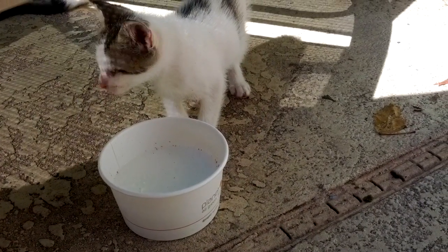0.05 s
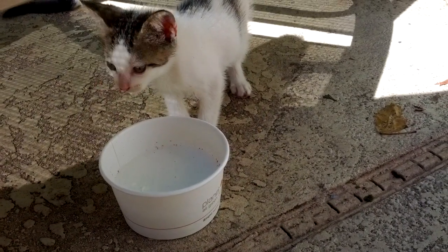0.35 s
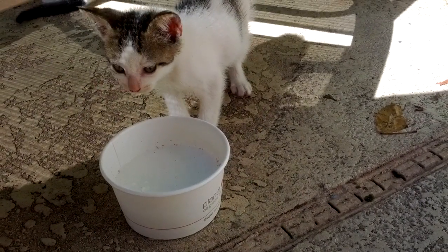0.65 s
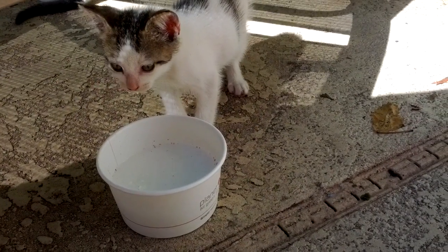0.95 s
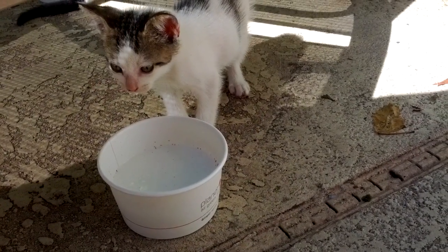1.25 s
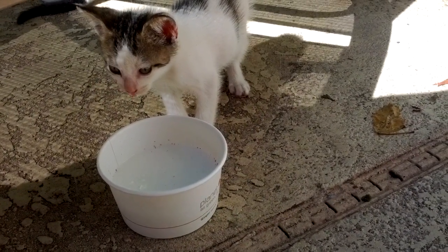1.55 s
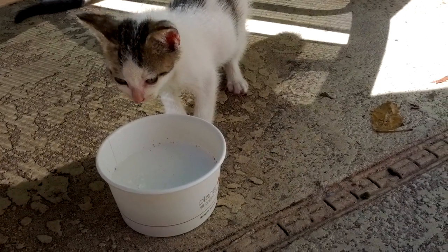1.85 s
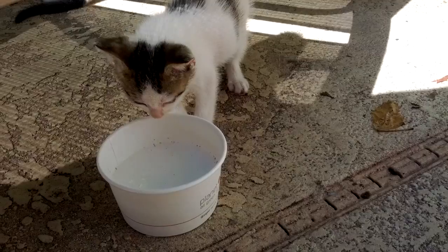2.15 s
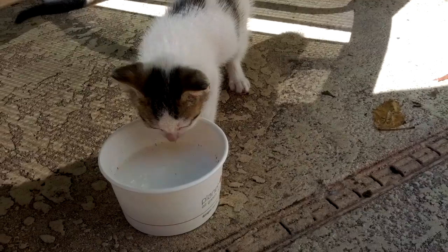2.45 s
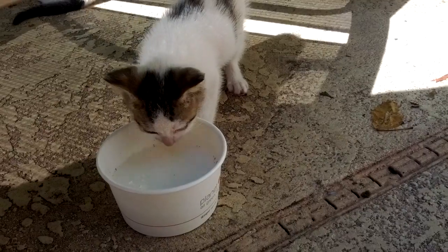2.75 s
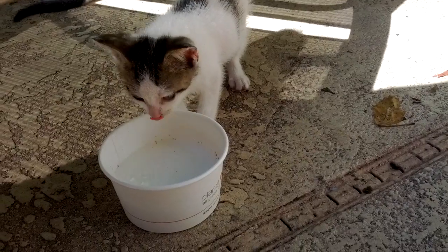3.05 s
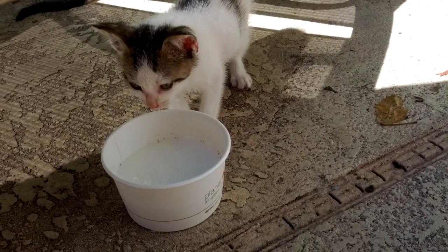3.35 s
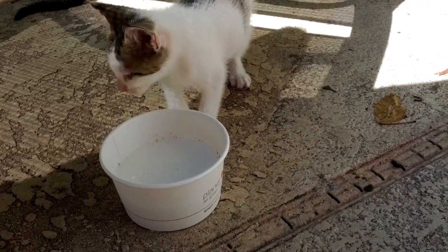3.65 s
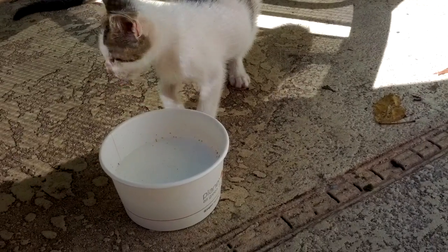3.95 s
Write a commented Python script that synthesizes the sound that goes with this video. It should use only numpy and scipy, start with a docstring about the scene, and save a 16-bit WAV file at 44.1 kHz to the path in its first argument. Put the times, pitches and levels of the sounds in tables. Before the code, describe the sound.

A distant engine hums and slowly rises in pitch, heard from a sheltered yard over a low traffic rumble and faint hiss. At about 0.8 seconds something hard knocks once nearby, sharp and hollow, with a brief echo. The engine booms louder from around 1.5 seconds, peaks in pitch near 3 seconds, then drops with a short exhaust burble and fades. A few tiny ticks sit in the background.

```python
"""A distant engine slowly speeds up, then the throttle closes and the exhaust burbles.
Its firings make a stack of tones, and the one at five times the firing rate booms.
We listen from a sheltered yard, where something hard knocks once nearby and the walls ring briefly.
Behind it all, far traffic rumbles, and tiny ticks and thin whines sit in the hiss."""
import sys
import numpy as np
from scipy import signal
from scipy.io import wavfile

SR = 44100
rng = np.random.default_rng(int(sys.argv[2]) if len(sys.argv) > 2 else 0)


def file_out(sig):
    """Save sig as 16-bit WAV at sys.argv[1]."""
    # one column per channel
    cols = np.atleast_2d(sig).T
    # limit, then scale
    lim = np.clip(cols, -1, 1)
    pcm = np.round(lim * 32767).astype(np.int16)
    wavfile.write(sys.argv[1], SR, pcm)


N = 176400
T = np.arange(N) / SR

# how fast the engine fires: time_s, firing_rate_hz
FIRING_RATE = [(0, 25.5), (0.5, 27.2), (1.0, 30.2), (1.25, 31.5), (1.6, 32.8), (2.05, 34.5), (2.3, 34.9),
               (2.55, 35.55), (2.85, 35.95), (3.07, 35.8), (3.3, 33.8), (3.5, 32.0), (4.0, 29.7)]
# loudness of the low exhaust note: time_s, level_db
NOTE_LEVEL = [(0, -52.5), (0.45, -46.5), (0.75, -43.5), (1.3, -45.5), (1.9, -46), (2.3, -47), (2.7, -46.5),
              (3.05, -54.5), (3.3, -49.5), (3.5, -55), (4.0, -53.5)]
# tones in that note: multiple_of_firing_rate, gain_db
NOTE_TONES = {2: -9, 3: -5.5, 4: 0, 6: 0.36}
# loudness of the higher exhaust drone: time_s, level_db
DRONE_LEVEL = [(0, -50), (0.55, -49), (0.95, -53.5), (1.2, -46.5), (1.75, -44.5), (2.1, -45.5),
               (2.42, -45.5), (2.6, -53.5), (3.3, -54.5), (4.0, -71)]
# tones in that drone: multiple_of_firing_rate, gain_db
DRONE_TONES = {7: -16.5, 8: 0, 9: -4.5, 10: -13}
# loudness of the boom: time_s, level_db
BOOM_LEVEL = [(0, -49), (0.9, -53), (1.15, -50), (1.45, -43), (1.68, -36), (1.9, -36.5), (2.15, -37.5),
              (2.4, -34), (2.9, -35.5), (3.12, -35.5), (3.24, -31.5), (3.33, -31.5), (3.39, -48),
              (3.6, -45), (4.0, -61)]
# loudness of the rough burble, strongest as the throttle closes: time_s, level_db
BURBLE_LEVEL = [(0, -52.5), (3.05, -60), (3.27, -35.5), (3.42, -45.5), (3.68, -42), (3.85, -53.5),
                (4.0, -73)]
# quick contacts that make up the knock: start_s, thud_db, crack_db
CONTACTS = [(0.7594, -18, -28), (0.7647, -41, -24), (0.7662, -34, -28.5), (0.7699, -33, -33.5),
            (0.7885, -49, -38), (0.7945, -29, -29)]
# tones of the struck object (a fade is a drop of 60 dB): pitch_hz, gain_db, fade_s
OBJECT_TONES = [(475, -23, 0.021), (652, 2.5, 0.013), (810, 2.5, 0.016), (900, -18, 0.15),
                (967, -16.5, 0.12), (1497, -22.5, 0.13), (1738, -23, 0.06), (2960, -34, 0.074),
                (3500, -26, 0.092), (3680, -28, .14), (4470, -37, 0.12)]
# tone colour of the crack: frequency_hz, relative_db_per_hz
CRACK_COLOUR = [(200, 0), (450, 9), (850, 2), (1200, -5), (1600, 3), (2150, -9), (3000, 0.5), (3800, -1),
                (5500, -7.5), (8000, -7.5), (10000, -7.5), (12000, -10.5), (14000, -8.5), (16000, -23)]
# echoes of the thud from nearby walls: delay_s, gain_db
WALL_ECHOES = [(0.0166, -10), (0.0292, -8), (0.0345, -13)]
# faint taps, ticks and scuffs on the ground: peak_s, level_db, pitch_hz, half_length_s
GROUND_TICKS = [(0.59, -49.5, 1260, 0.018), (0.598, -60.5, 4400, 0.034), (0.878, -44, 970, 0.012),
                (1.165, -68, 5000, 0.016), (1.36, -64, 12600, .02), (2.048, -58, 12600, 0.008),
                (2.299, -57, 3120, 0.0034), (2.463, -55.5, 3600, 0.0035), (2.567, -54, 2400, 0.0022),
                (3.036, -61, 3500, .004), (3.076, -54, 12700, .003), (3.549, -62, 12600, .006)]
# tone colour of the far traffic and the hiss: frequency_hz, relative_db_per_hz
TRAFFIC_COLOUR = [(20, -10), (35, -4), (45, -14), (60, 1), (78, 2.5), (95, -3.5), (130, -3.5), (200, -6.5),
                  (240, -8), (330, -5.5), (410, -12), (530, -11.5), (660, -20.5), (950, -19), (1200, -20.5),
                  (1650, -24), (2100, -31.5), (2500, -33.5), (3000, -35.5), (5000, -36.5), (7000, -42),
                  (9500, -42.5), (12000, -38.5), (16000, -43.5)]
# loudness of the traffic's rumble: time_s, level_db
RUMBLE_LEVEL = [(0, -38), (0.35, -39.5), (1.4, -38.5), (2.2, -39), (3.0, -40), (3.8, -39), (4.0, -43)]
# soft swells in the rumble: peak_s, level_db, pitch_hz, half_length_s
RUMBLE_SWELLS = [(0.325, -31.5, 72, 0.017), (0.63, -38, 62.4, 0.05), (0.77, -38.5, 116, 0.055),
                 (1.23, -47, 275, 0.041), (1.36, -41, 75.6, 0.047), (2.4, -40, 77, 0.11),
                 (2.43, -39, 296, 0.051), (2.65, -42.5, 112, 0.082), (3.53, -38, 72, 0.016),
                 (3.84, -37, 69, 0.028)]
# faint whines in the hiss: pitch_hz, level_db
THIN_WHINES = [(1573, -70), (1631, -83.5), (2790, -79.5), (2980, -77.5), (5540, -82.5), (10450, -79),
               (11630, -77), (13390, -83)]


def engine(boom_multiple=5, boom_waver_db=0.8):
    """Only low multiples of the firing rate carry this far; one booms, and the upper ones blur."""
    phase = 2 * np.pi * np.cumsum(curve(FIRING_RATE)) / SR
    note = from_db(curve(NOTE_LEVEL)) * exhaust_tones(phase, NOTE_TONES, waver_rad=0.34)
    drone = from_db(curve(DRONE_LEVEL)) * exhaust_tones(phase, DRONE_TONES, waver_rad=0.46)
    boom_db = curve(BOOM_LEVEL) + boom_waver_db * drift(1.2)
    boom = from_db(boom_db) * np.sin(boom_multiple * phase)
    burble = from_db(curve(BURBLE_LEVEL)) * band_noise(low_hz=162.9, high_hz=210.3)
    return np.sqrt(2) * (note + drone + boom) + burble


def exhaust_tones(phase, tones, waver_rad, waver_db=2):
    """Tones at multiples of the firing rate, each wavering a little on its way."""
    sound = 0
    for multiple, db in tones.items():
        gain = from_db(db + waver_db * drift(1.94))
        offset = rng.uniform(0, 2 * np.pi) + waver_rad * drift(5.3)
        sound += gain * np.sin(multiple * phase + offset)
    return sound


def knock(thud_tail_db=-10):
    """A struck object gives a hollow thud and a bright clatter, and the walls throw both back."""
    clicks, crack_level = np.zeros(N), np.zeros(N)
    for start_s, thud_db, crack_db in CONTACTS:
        clicks[int(start_s * SR)] += from_db(thud_db)
        crack_level += from_db(crack_db) * fade(start_s, fade_s=0.013)
    thud = sum((-1) ** (k + 1) * from_db(db) * ring(clicks, hz, fade_s)  # every other tone is flipped
               for k, (hz, db, fade_s) in enumerate(OBJECT_TONES))
    echoes = sum(from_db(db) * np.interp(T - delay_s, T, thud) for delay_s, db in WALL_ECHOES)
    tail_level = wall_tail()
    yard_echo = (tail_level * rng.standard_normal(N))[:SR]
    yard_echo /= np.linalg.norm(yard_echo)
    thud_tail = from_db(thud_tail_db) * signal.fftconvolve(thud, yard_echo)[:N]
    crack_noise = sum(noise for hz, noise in noise_bands(CRACK_COLOUR, low_hz=190))
    crack_tail = np.interp(T - CONTACTS[0][0], T, tail_level)  # follows the first contact
    return thud + echoes + thud_tail + crack_noise * np.hypot(crack_level, crack_tail)


def wall_tail(delay_s=0.0036, build_s=0.0025):
    """Loudness of the wall reflections after a blow: a dense early rush, then a short tail."""
    build = 1 - np.exp(-np.maximum(T - delay_s, 0) / build_s)
    early = from_db(-29) * fade(delay_s, fade_s=0.08)
    late = from_db(-34.5) * fade(delay_s, fade_s=0.37)
    return build * np.hypot(early, late)


def noise_puffs(rows, spread):
    """Smooth bursts of noise: short high ones tick, longer low ones swell."""
    sound = 0
    for peak_s, db, hz, half_length_s in rows:
        bump = np.exp(-((T - peak_s) / half_length_s) ** 2)
        sound += from_db(db) * bump * band_noise(hz / spread, hz * spread)
    return sound


def traffic(rumble_below_hz=660, rumble_waver_db=1.53, hiss_db=-40, hiss_waver_db=0.64):
    """Far traffic makes a gently heaving rumble under an even hiss."""
    rumble_db, sound = curve(RUMBLE_LEVEL), 0
    for hz, noise in noise_bands(TRAFFIC_COLOUR, low_hz=22.6):
        if hz < rumble_below_hz:
            sound += noise * from_db(rumble_db + rumble_waver_db * drift(4.8))
        else:
            sound += noise * from_db(hiss_db + hiss_waver_db * drift(4.8))
    return sound


def whines(spread=0.0018):
    """Very narrow bands of noise sound like thin whines that barely rise out of the hiss."""
    return sum(from_db(db) * band_noise(hz * (1 - spread), hz * (1 + spread)) for hz, db in THIN_WHINES)


def from_db(db):
    """Turn decibels into a number to multiply by."""
    return 10 ** (np.asarray(db) / 20)


def unit_level(x):
    """Scale a signal so its average level (rms) is 1."""
    return x / np.sqrt(np.mean(x ** 2) + 1e-20)


def curve(rows):
    """Join (time, value) points with straight lines."""
    return np.interp(T, *np.transpose(rows))


def drift(rate_hz):
    """A slow random wander, about 1 in size."""
    step, warm_up = 40, 2000
    decay = np.exp(-2 * np.pi * rate_hz * step / SR)
    noise = rng.standard_normal(N // step + warm_up + 2)
    slow = signal.lfilter([1], [1, -2 * decay, decay ** 2], noise)[warm_up:]
    return np.interp(np.arange(N) / step, np.arange(len(slow)), unit_level(slow))


def band_noise(low_hz, high_hz):
    """Noise between two frequencies, at level 1."""
    band = signal.butter(4, [low_hz, min(high_hz, 0.45 * SR)], "band", fs=SR, output="sos")
    return unit_level(signal.sosfilt(band, rng.standard_normal(N + SR // 4))[-N:])


def noise_bands(colour, low_hz):
    """Noise in third-octave bands with a total power of 1, as (centre_hz, noise) pairs."""
    edges = low_hz * 2 ** np.arange(0, np.log2(20000 / low_hz), 1 / 3)
    centres = np.sqrt(edges[1:] * edges[:-1])
    hz, db = np.transpose(colour)
    gains = from_db(np.interp(np.log(centres), np.log(hz), db)) * np.sqrt(np.diff(edges))
    gains /= np.linalg.norm(gains)
    return [(centre, gain * band_noise(low, high))
            for centre, gain, low, high in zip(centres, gains, edges, edges[1:])]


def fade(start_s, fade_s):
    """Jump to 1, then drop by 60 dB every fade_s."""
    return (T >= start_s) * 1000.0 ** (-np.maximum(T - start_s, 0) / fade_s)


def ring(clicks, hz, fade_s):
    """Each click starts a pure tone that dies away."""
    decay = np.exp(-np.log(1000) / (fade_s * SR))
    angle = 2 * np.pi * hz / SR
    return signal.lfilter([0, np.sin(angle)], [1, -2 * decay * np.cos(angle), decay ** 2], clicks + 1e-18)


def scene():
    """Add all the sounds into one channel."""
    background = traffic() + noise_puffs(RUMBLE_SWELLS, spread=1.133)
    mix = engine() + knock() + noise_puffs(GROUND_TICKS, spread=1.096) + whines() + background
    return mix[None]


def record(dry, cutoff_hz=15800):
    """Cut off the very highest treble steeply."""
    return signal.sosfilt(signal.ellip(12, 0.1, 80, cutoff_hz, fs=SR, output="sos"), dry)


dry = scene()
out = record(dry)
file_out(out)
```